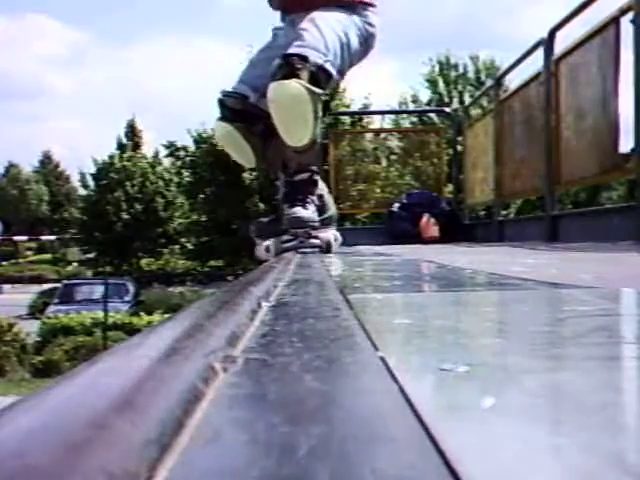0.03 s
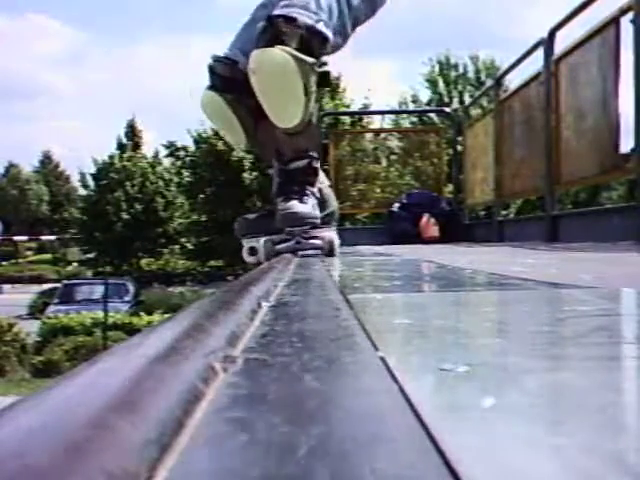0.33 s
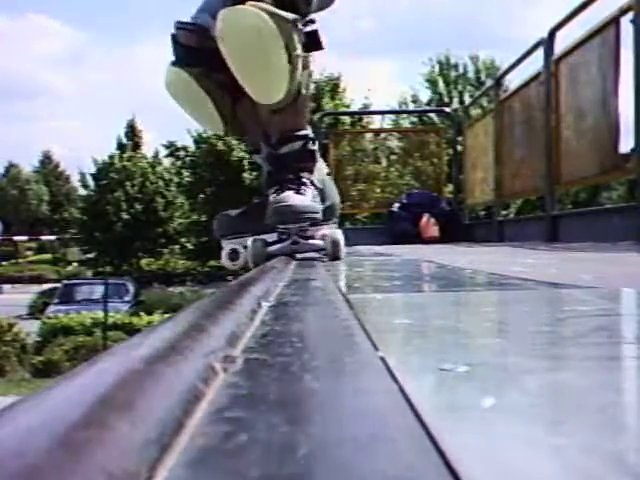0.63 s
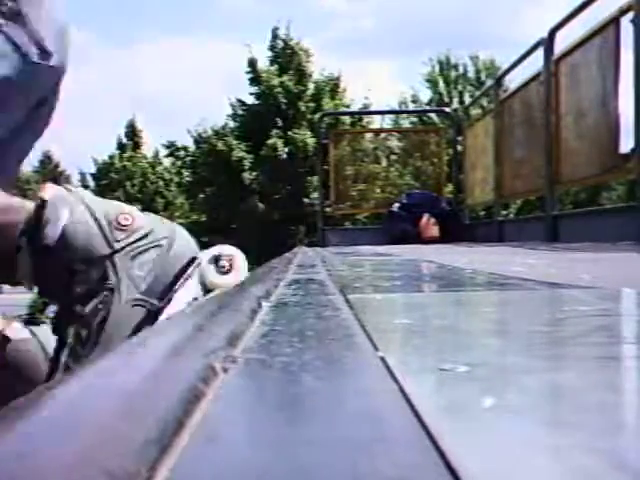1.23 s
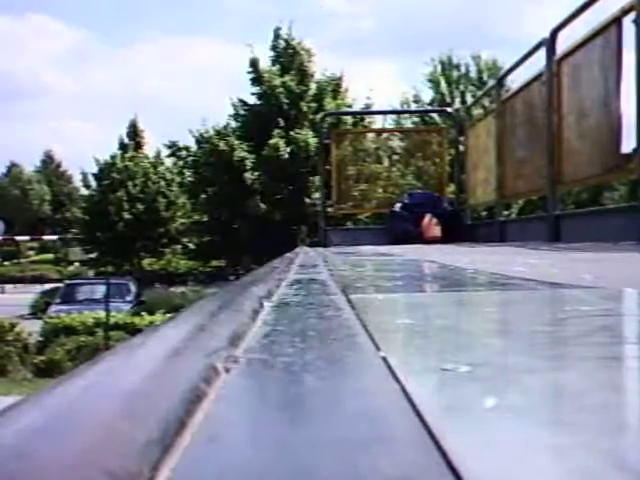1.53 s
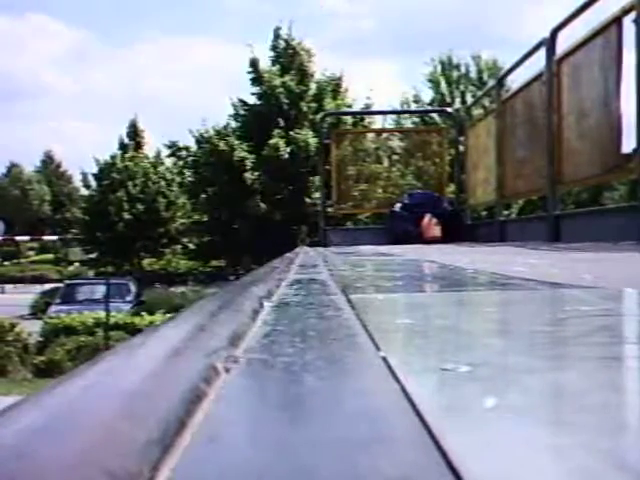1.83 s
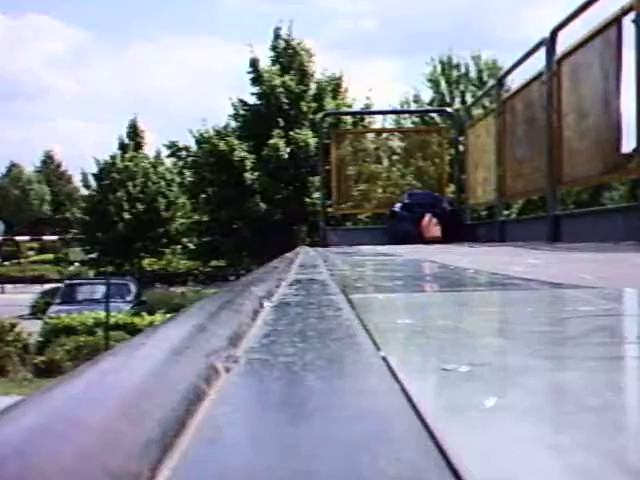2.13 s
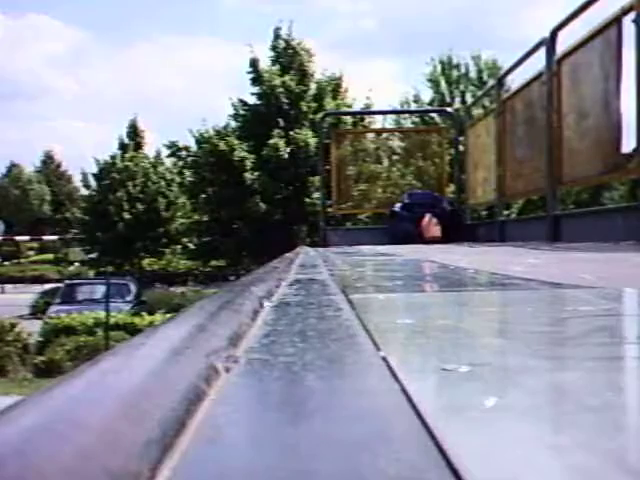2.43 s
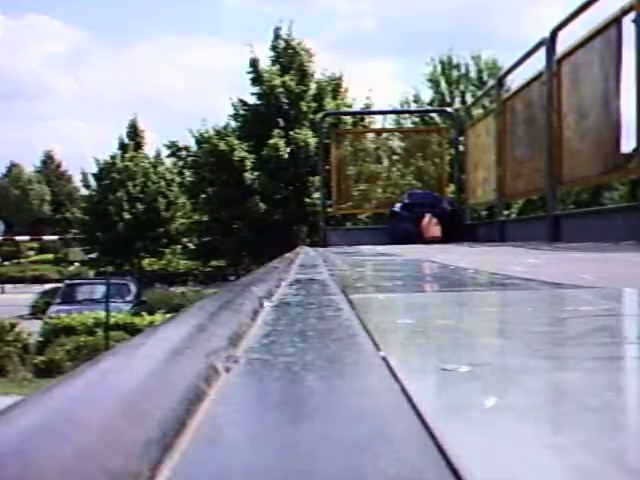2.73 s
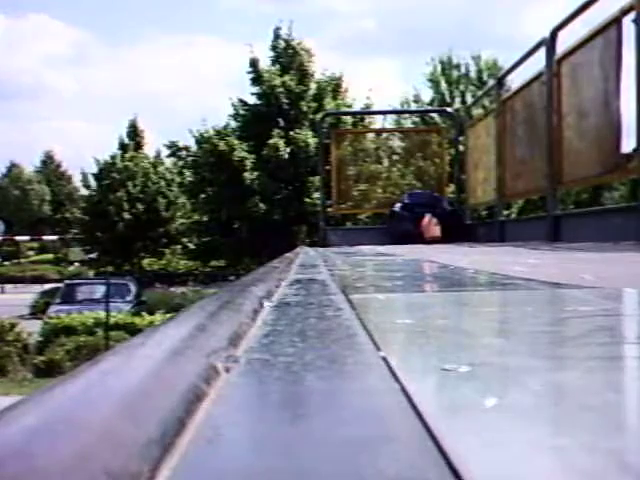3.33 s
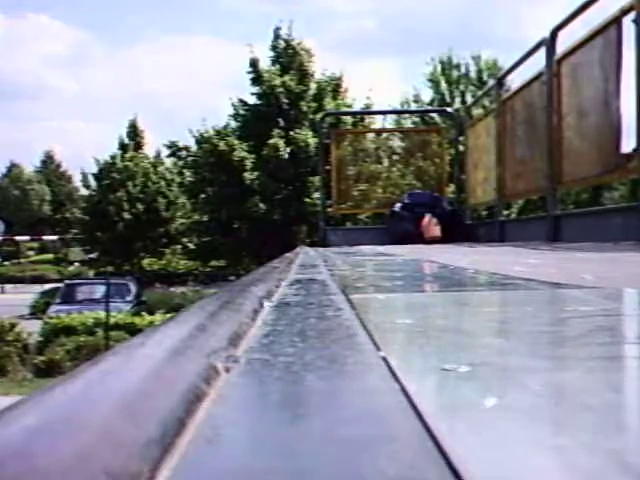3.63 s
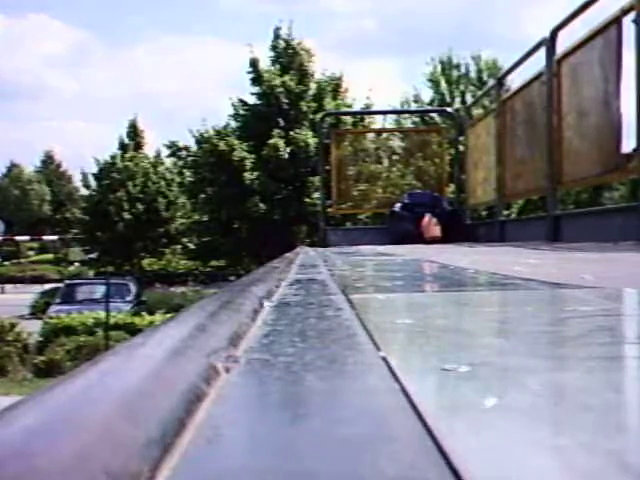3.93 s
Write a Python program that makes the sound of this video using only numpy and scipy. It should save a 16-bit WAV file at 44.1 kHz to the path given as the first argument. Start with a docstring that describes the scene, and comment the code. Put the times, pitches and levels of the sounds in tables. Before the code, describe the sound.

Roller skates grind along a ramp's steel edge for the first second, scraping, catching and ringing close by. They clack off at about 1.2 seconds and land hard around 1.3, the loudest hits crackling with distortion. The wheels roll away over the hollow, booming ramp, fading by 2.5 seconds. A few distant knocks come at 3 seconds, followed by faint ticks and a thin whine over quiet outdoor air.

```python
"""Roller skates on a ramp

Skates grind along the steel pipe on the edge of an outdoor ramp, towards a camera lying on the deck.
They clack off the pipe and land. The wheels roll away over the booming, hollow ramp, knock on its
far side and tick on with a thin whine. The loudest blows overload the camera's narrow sound channel."""
import sys
import numpy as np
from scipy import signal
from scipy.fft import rfft, irfft, next_fast_len
from scipy.io import wavfile
from scipy.ndimage import map_coordinates

SR = 44100
rng = np.random.default_rng(int(sys.argv[2]) if len(sys.argv) > 2 else 0)


def wrap_up_sound(samples):
    """Save the sound to the file named by the first command line argument, as 16-bit audio."""
    columns = np.atleast_2d(samples).T
    # keep every value between -1 and 1, then stretch to whole-number steps
    tamed = np.clip(columns, -1, 1)
    steps = np.round(tamed * 32767).astype(np.int16)
    wavfile.write(sys.argv[1], SR, steps)


N = 176400

# how hard the skates press on the pipe (t/s, level/dB)
GRIND_PRESSURE = [(0, -19), (0.102, -19.5), (0.162, -21), (0.302, -20), (.42, -20), (.5, -19.5),
                  (0.618, -15), (0.689, -20.5), (0.778, -19), (0.882, -17), (0.968, -22.5), (1.022, -14.5),
                  (1.098, -12.5), (1.113, -25.5)]
# a skate catches on the pipe (t/s, level/dB)
CATCHES = [(0.042, -6.5), (0.083, -12), (0.102, -15), (0.192, -20), (.263, -13.5), (0.365, -17.5),
           (0.477, -6), (.559, -14.5), (.588, 0), (0.596, -14), (.853, -9.5), (0.888, -7), (0.923, -7.5),
           (0.999, -15), (1.012, -10), (1.037, -1), (1.076, -1.5)]
# tone of the scrape (f/Hz, level/dB)
GRIND_COLOUR = [(120, -35.5), (200, -13.5), (299, -38), (387, -29.5), (429, -23), (592, -16.5), (719, -18),
                (1010, -0.5), (1170, -1), (1690, -16.5), (1800, -18.5), (2070, -15.5), (2300, -17),
                (2520, -13.5), (2940, -24.5), (3620, -26.5), (4390, -50), (5710, -79), (9660, -120)]
# ring of the steel pipe (f/Hz, width/Hz, level/dB)
PIPE_RING = [(560, 53, -18.5), (969, 12, -7.5), (1116, 91, 1), (1255, 51, 5), (1319, 48, -4),
             (1530, 50, -3), (1654, 81, -7), (2127, 35, -5), (2600, 70, -25.5), (3660, 78, -19)]
# its ring under tipped skates (f/Hz, width/Hz, level/dB)
TIPPED_RING = [(1012, 40, -5), (1162, 41, -1.5), (1347, 30, 1.5), (1474, 24, 0), (1545, 35, -9.5),
               (1617, 40, -5), (2096, 90, -12), (2370, 29, -14), (2650, 32, -16), (3210, 160, -29.5),
               (3670, 95, -23)]
# the skates tip off the pipe (t/s, tipped share of the power)
TIPPING = [(0.301, 0.025), (0.798, 0.03), (0.949, 0), (1.028, 0.85)]
# bright rasp on top of the scrape, dying down (t/s, level/dB)
RASP_LEVEL = [(0, -12.5), (.15, -16.5), (.45, -18.5), (.7, -31), (1.1, -30)]
# ring of that rasp (f/Hz, width/Hz, level/dB)
RASP_RING = [(2575, 94, 1.5), (2720, 73, -2), (3572, 59, -1), (4470, 29, -17)]
# higher notes of the deck (f/Hz, width/Hz, level/dB)
DECK_RING = [(177, 20, -8), (200.8, 13, 1.5), (223.9, 19, -3.5), (281, 6, -11), (368, 30, -19.5)]
# shaking of the deck (t/s, level/dB)
BOOM_LEVEL = [(0, -23.5), (.28, -25), (.35, -36), (.47, -28), (.55, -24), (.9, -31), (1.0, -25),
              (1.08, -20), (1.21, -25), (1.29, -11.5), (1.42, -17.5), (1.6, -13.5), (1.68, -21),
              (1.75, -15.5), (1.97, -14.5), (2.02, -29), (2.1, -21), (2.28, -16.5), (2.48, -16),
              (2.55, -37), (2.7, -30), (3.0, -31.5), (3.13, -19), (3.2, -20), (3.33, -29), (3.45, -30),
              (3.75, -26.5), (4, -32)]
# tone of its boom (f/Hz, level/dB)
BOOM_COLOUR = [(20, -56.5), (45, -42.5), (62, -34), (85, -19.5), (102, -14.5), (120, -6), (133, 2),
               (146, -4.5), (165, -24), (205, -23), (250, -37.5), (320, -43), (385, -45.5), (480, -44.5),
               (900, -95)]
# heavy jolts of the deck (t/s, level/dB)
JOLTS = [(1.305, -8), (2.061, -13.5), (2.17, -14.5), (2.315, -9), (2.376, -12), (2.414, -6.5),
         (2.616, -16.5), (3.049, -9.5), (3.497, -17), (3.589, -21), (3.681, -21)]
# tone of the outdoor background (f/Hz, level/dB)
AIR_COLOUR = [(150, -24.5), (380, -5.5), (520, -19.5), (650, -13.5), (800, -23), (1250, -6.5), (1500, -23),
              (2700, -21), (3200, -24), (3700, -19), (4200, -40), (5000, -70.5)]
# skates hit the edge (t/s, level/dB, hold/s, fade/s)
CLACKS = [(1.1545, -4.5, 0.019, 0.065), (1.180, -14.5, 0.0021, 0.0595)]
# ring of a skate's plate and axle mounts (f/Hz, width/Hz, level/dB)
SKATE_RING = [(978, 19, -1.5), (1262, 66, 7), (1414, 130, -2), (2180, 110, -7), (2680, 74, -2),
              (2820, 21, -22.5), (3350, 17, -21), (3520, 27, -27)]
# wheels hit the ramp (t/s, level/dB, hold/s, fade/s)
LANDINGS = [(1.267, -13, 0.025, 0.097), (1.311, -11.5, 0.012, 0.06), (1.325, -7, 0.019, 0.12),
            (1.357, 0.5, 0.015, 0.061), (1.397, -10.5, 0.0054, .06)]
# wheels roll on the ramp (t/s, level/dB)
ROLL_LEVEL = [(1.12, -45), (1.25, -37), (1.28, -18), (1.43, -22), (1.54, -17), (1.66, -17), (1.8, -20.5),
              (1.9, -29.5), (2.03, -31.5), (2.16, -34.5), (2.3, -34), (2.45, -35), (2.7, -53), (2.98, -69),
              (3.2, -56.5), (3.6, -59.5), (4, -60)]
# tone of the wheels close by (f/Hz, level/dB)
NEAR_COLOUR = [(160, -42.5), (280, -18), (341, -30), (382, -12.5), (424, -22), (578, -16), (896, -7.5),
               (1210, 3.5), (1300, -2), (1790, -30), (2640, -27), (3140, -41.5), (3740, -36.5),
               (4390, -57.5), (5710, -92.5), (9660, -120)]
# tone of the wheels further off (f/Hz, level/dB)
FAR_COLOUR = [(160, -40), (280, -11), (325, -15.5), (396, -9.5), (534, -12.5), (578, -8), (866, -13.5),
              (1120, 0), (1730, -31), (2330, -31.5), (2770, -23.5), (3220, -39), (3690, -27), (4390, -54.5),
              (5710, -85), (9660, -120)]
# wheels cross bumps (t/s, level/dB)
BUMPS = [(1.788, -11.5), (1.848, -18), (2.078, -27), (2.122, -22), (2.212, -22), (2.246, -19),
         (2.298, -33.5)]
# thin whines (t/s, length/s, start f/Hz, top f/Hz, level/dB)
WHINES = [(2.76, .19, 1330, 1435, -53), (3.66, .33, 1265, 1380, -47)]
# tone of a wheel's soft touch just before the knocks (f/Hz, level/dB)
TOUCH_COLOUR = [(300, -12), (620, -1.5), (900, -3), (1500, -19), (3000, -33.5)]
# knocks on the far side, then wheel ticks (t/s, level/dB)
KNOCKS = [(3.024, -25.5), (3.05, -23.5), (3.079, -30.5), (3.105, -43), (3.218, -48.5), (3.385, -50),
          (3.495, -45.5), (3.58, -49.5), (3.674, -47.5), (3.775, -49), (3.881, -50), (3.967, -46.5)]
# ring of the far panels (f/Hz, width/Hz, level/dB)
PANEL_RING = [(610, 55, -14.5), (880, 340, -4.5), (1250, 65, -3.5), (1863, 26, -19), (2750, 150, 5.5),
              (3050, 110, -4.5), (3590, 220, -1.5), (3830, 100, -13.5), (4390, 150, -15)]
# overload clicks (t/s, height)
CLICKS = [(.5904, 0.33), (.5921, 0.54), (1.0455, .9), (1.2843, .9), (1.3977, .9), (1.5456, 1),
          (2.4127, 0.95)]
# treble shaping of the overload's fizz (f/Hz, level/dB)
FIZZ_COLOUR = [(4300, 0), (5000, -9), (9000, -2), (15000, -1.5)]


def amp(db):
    """Turn decibels into a gain."""
    return 10 ** (np.asarray(db) / 20)


def unit(x):
    """Scale x to an average power of 1."""
    return x / np.sqrt(np.mean(x ** 2) + 1e-20)


def clock():
    """Time of each sample in seconds."""
    return np.arange(N) / SR


def level(rows):
    """A gain for each sample, from (t/s, level/dB) points."""
    return amp(np.interp(clock(), *np.transpose(rows)))


def wobble(rate):
    """A smooth curve through `rate` random values a second."""
    return map_coordinates(rng.standard_normal(int(N * rate / SR) + 4), [clock() * rate])


def filtered(x, response):
    """Multiply each frequency f in x by response(f)."""
    size = next_fast_len(N + SR // 2)
    return irfft(rfft(x, size) * response(np.fft.rfftfreq(size, 1 / SR)), size)[:N]


def coloured(x, points):
    """Give x a tone from (f/Hz, level/dB) points; white noise keeps its power."""
    hz, db = np.transpose(points)
    return filtered(x, lambda f: unit(amp(np.interp(np.log(f + 1), np.log(hz), db, -120, -120))))


def rung(x, notes):
    """Let x ring an object's natural notes; white noise keeps its power."""
    def response(f):
        peaks = sum((-1) ** k * amp(db) * 1j * f * width / (hz * hz - f * f + 1j * f * width)
                    for k, (hz, width, db) in enumerate(notes))
        return peaks / np.sqrt(np.mean(abs(peaks) ** 2))
    return filtered(x, response)


def grit(rate, spread_db):
    """Tiny random hits of uneven size, about `rate` a second."""
    hits = rng.random(N) < rate / SR
    signs = np.sign(rng.standard_normal(N))
    sizes = amp(spread_db * np.clip(rng.standard_normal(N), -2, 2))
    return unit(hits * signs * sizes)


def burst(start, hold_s, fade_s):
    """Outline of a blow: it starts at once, holds, then drops 60 dB every fade_s."""
    age = clock() - start
    return (age >= 0) * amp(-60 * np.maximum(age - hold_s, 0) / fade_s)


def grind():
    """Skates scrape and catch on the pipe; its ring shifts as they tip off, and the deck hums along."""
    sliding = level(GRIND_PRESSURE) * burst(0, hold_s=GRIND_PRESSURE[-1][0], fade_s=0.052)
    sliding *= amp(-1.5 + 1.57 * wobble(70))
    catches = sum(amp(db) * burst(s, hold_s=0.0037, fade_s=0.05) for s, db in CATCHES)
    force = sliding * grit(rate=2500, spread_db=6) + amp(-4) * catches * grit(rate=5000, spread_db=1)
    tipped = np.interp(clock(), *np.transpose(TIPPING))
    flat_force = force * np.sqrt(1 - tipped)
    pipe = amp(-2.5) * rung(flat_force, PIPE_RING) + amp(-6) * coloured(flat_force, GRIND_COLOUR)
    tipped_pipe = amp(2.5) * rung(force * np.sqrt(tipped), TIPPED_RING)
    rasp_force = level(RASP_LEVEL) * (sliding + amp(-8.5) * catches) * grit(rate=980, spread_db=5.5)
    hum = amp(-22) * sliding ** 0.9 * rung(rng.standard_normal(N), DECK_RING)
    return pipe + tipped_pipe + rung(rasp_force, RASP_RING) + hum


def deck_boom(swell_s=0.024, low_cut_hz=80):
    """The hollow deck booms on its lowest notes and swells at each jolt."""
    shake = coloured(rng.standard_normal(N), BOOM_COLOUR)
    loudness = abs(signal.hilbert(shake))
    shake = unit(shake / (loudness + 0.38) ** 0.6)  # partly even out the noise's own ups and downs
    swells = sum(amp(db) * np.exp(-((clock() - s) / swell_s) ** 2) for s, db in JOLTS)
    shake *= np.hypot(level(BOOM_LEVEL), swells)
    boom = filtered(shake, lambda f: f ** 2 / np.hypot(f ** 2, low_cut_hz ** 2))
    lowest_note = amp(-60) * rung(rng.standard_normal(N), [(45.4, 10, 0)])
    return boom + lowest_note


def air():
    """A faint, steady rush of outdoor noise."""
    return amp(-52) * coloured(rng.standard_normal(N), AIR_COLOUR)


def slams():
    """The axle mounts clack off the edge, then the wheels slap on to the ramp and shake the deck."""
    clack = sum(amp(db) * burst(s, hold, fade) for s, db, hold, fade in CLACKS)
    clack *= grit(rate=4000, spread_db=0.5)
    landing = sum(amp(db) * burst(s, hold, fade) for s, db, hold, fade in LANDINGS)
    landing *= grit(rate=6000, spread_db=1.5)
    edge = amp(-2.5) * rung(clack, SKATE_RING) + amp(-5) * coloured(clack, GRIND_COLOUR)
    ramp = amp(-0.5) * coloured(landing, NEAR_COLOUR) + amp(-9) * rung(landing, DECK_RING)
    return edge + ramp


def wheels(near_until_s=1.78, far_from_s=1.8):
    """Wheels chatter over the ramp and its bumps; their tone changes as they roll away."""
    bumps = sum(amp(db) * burst(s, hold_s=0.011, fade_s=0.13) for s, db in BUMPS)
    rolling = level(ROLL_LEVEL) * (clock() > ROLL_LEVEL[0][0]) * amp(0.9 * wobble(45))
    force = np.hypot(rolling, amp(-5) * bumps) * grit(rate=3600, spread_db=2)
    far = np.interp(clock(), [near_until_s, far_from_s], [0, 1])
    hum = amp(-10) * rung(force, DECK_RING)
    return coloured(force * (1 - far), NEAR_COLOUR) + coloured(force * far, FAR_COLOUR) + hum


def whines():
    """Each thin whine, perhaps from a wheel, rises in pitch and then sags a little."""
    out = np.zeros(N)
    for start, length, start_hz, top_hz, db in WHINES:
        progress = np.clip((clock() - start) / length, 0, 1)
        arch = np.sqrt(np.sin(np.pi * 0.8 * progress ** 1.2))
        hz = (start_hz + (top_hz - start_hz) * arch) * (1 + 0.003 * wobble(60))
        loudness = amp(db + 1.06 * wobble(25.63)) * np.sqrt(abs(np.sin(np.pi * progress)))
        out += loudness * np.sin(2 * np.pi * np.cumsum(hz) / SR)
    return out


def far_knocks():
    """A wheel touches softly, then distant knocks and ticks ring the ramp's panels."""
    touch = amp(-41) * burst(3.005, hold_s=0.03, fade_s=0.15) * rng.standard_normal(N)
    knocks = sum(amp(db) * burst(s, hold_s=0.003, fade_s=0.053) for s, db in KNOCKS)
    return coloured(touch, TOUCH_COLOUR) + rung(knocks * grit(rate=3200, spread_db=1), PANEL_RING)


def scene():
    """All the sounds as they reach the camera on the deck, in one channel."""
    return (grind() + slams() + wheels() + deck_boom() + far_knocks() + whines() + air())[None]


def record(dry, flip_above=1.05, ceiling=0.7, click_s=0.0001, crackle_hz=3560, channel_hz=4284):
    """Overload: big peaks flip over, clicks sound at set times, and the narrow channel flattens peaks."""
    x = dry[0]
    # adding this throws a big peak just to the other side of zero
    crackle = np.where(abs(x) > flip_above, -np.sign(x) * 0.1 - x, 0)
    snaps = np.zeros(N)  # the clicks' sharp tips, which skip the narrow channel
    for s, height in CLICKS:
        i = round(s * SR)
        kick = -np.sign(x[i]) * height
        crackle += kick * np.exp(-((clock() - s) / click_s) ** 2)
        snaps[i] = kick * amp(-22)
    crackle = filtered(crackle, lambda f: 1 / np.sqrt(1 + (f / crackle_hz) ** 14))
    narrow = filtered(x + crackle, lambda f: 1 / np.sqrt(1 + (f / channel_hz) ** 80))
    flattened = narrow / (1 + abs(narrow / ceiling) ** 30) ** (1 / 30)

    def fizz_tone(f):
        top_cut = np.clip((16000 - f) / 600, 0, 1)  # nothing above 16 kHz
        return amp(np.interp(f, *np.transpose(FIZZ_COLOUR))) * top_cut
    return filtered(flattened + snaps, fizz_tone)[None]


dry = scene()
out = record(dry)
wrap_up_sound(out)
```